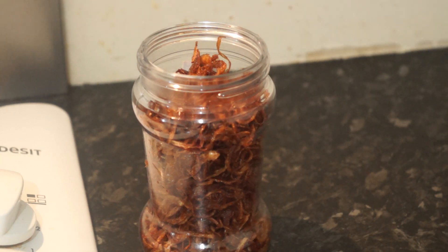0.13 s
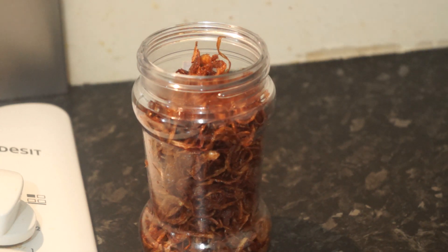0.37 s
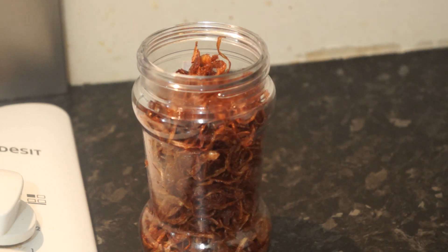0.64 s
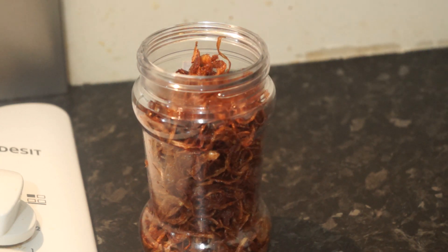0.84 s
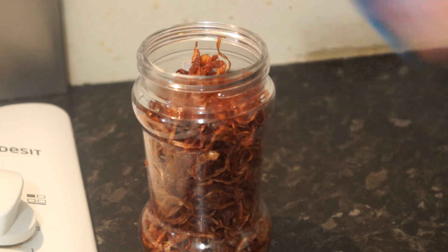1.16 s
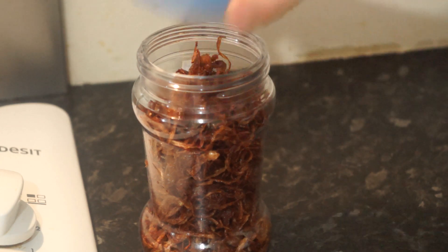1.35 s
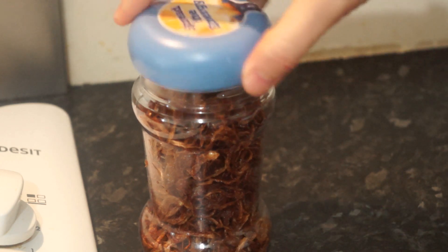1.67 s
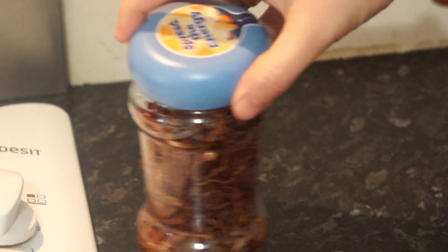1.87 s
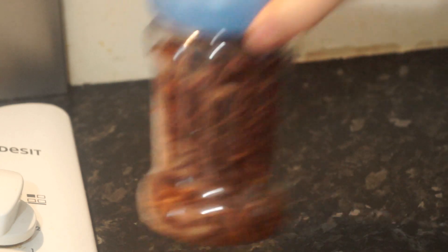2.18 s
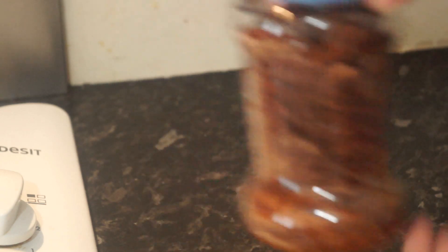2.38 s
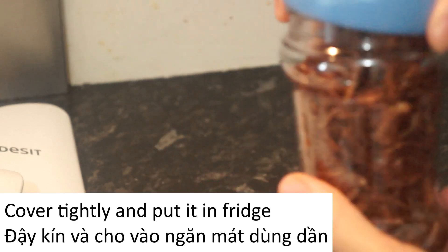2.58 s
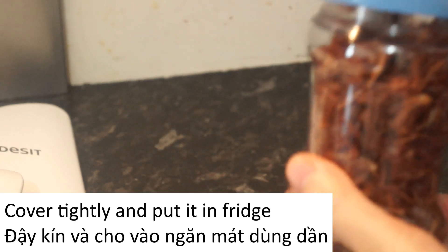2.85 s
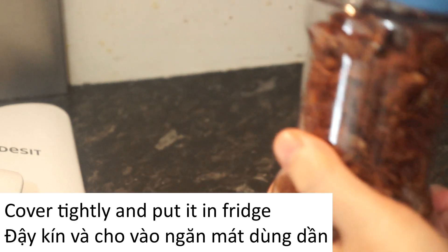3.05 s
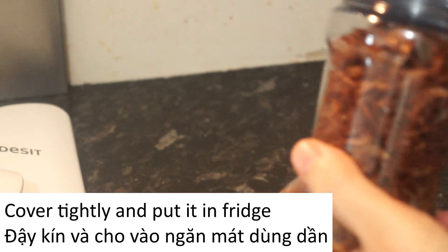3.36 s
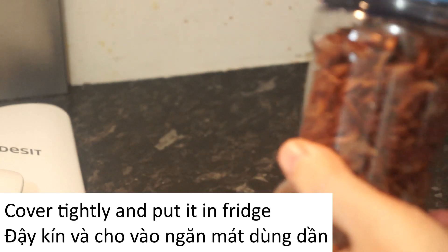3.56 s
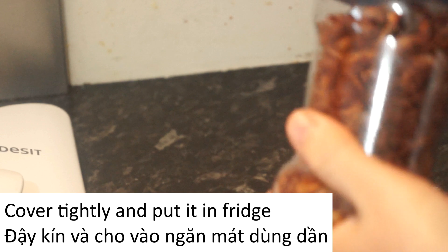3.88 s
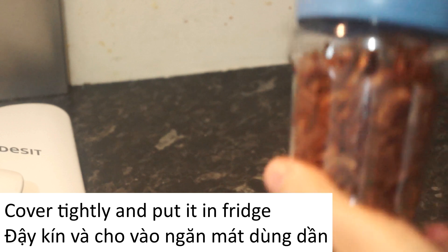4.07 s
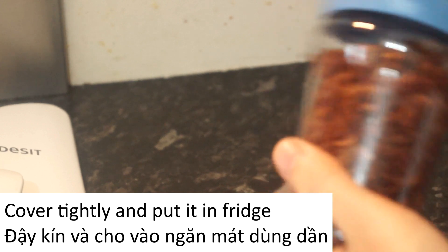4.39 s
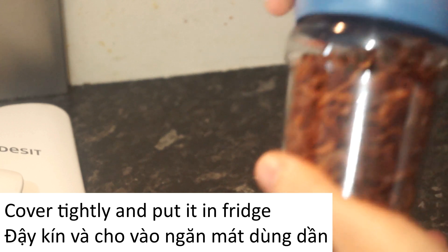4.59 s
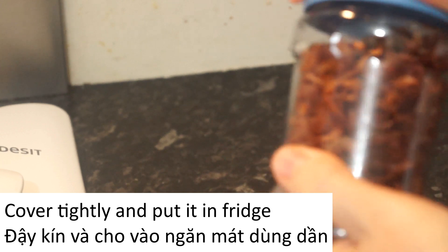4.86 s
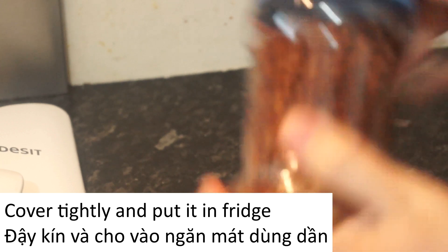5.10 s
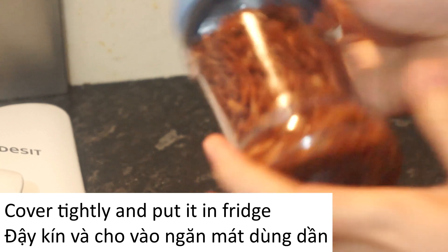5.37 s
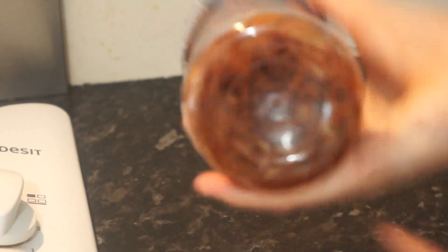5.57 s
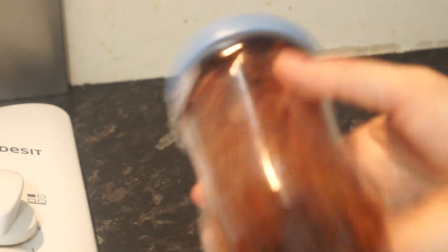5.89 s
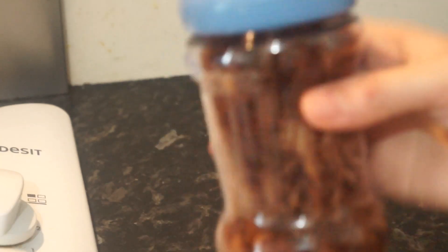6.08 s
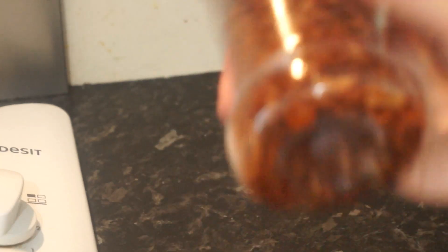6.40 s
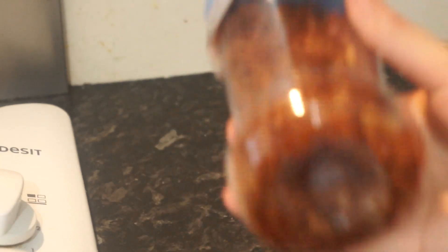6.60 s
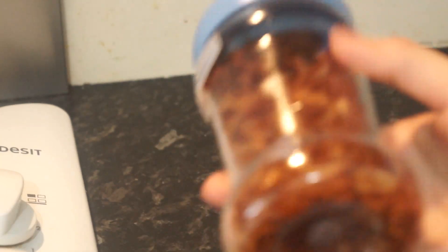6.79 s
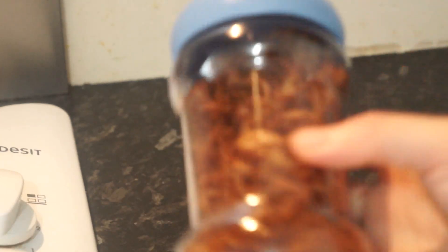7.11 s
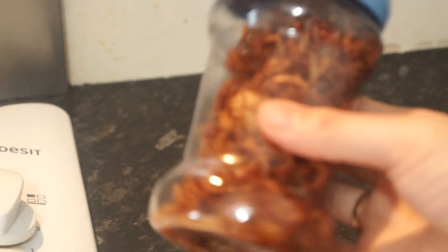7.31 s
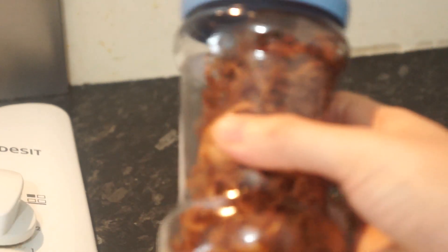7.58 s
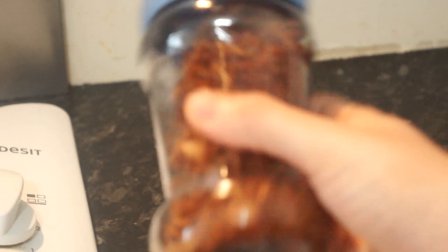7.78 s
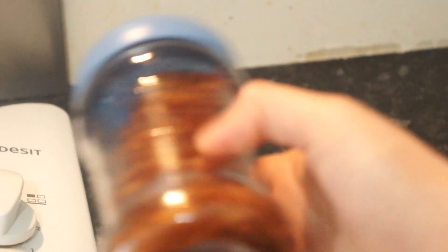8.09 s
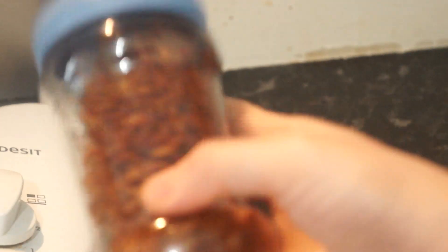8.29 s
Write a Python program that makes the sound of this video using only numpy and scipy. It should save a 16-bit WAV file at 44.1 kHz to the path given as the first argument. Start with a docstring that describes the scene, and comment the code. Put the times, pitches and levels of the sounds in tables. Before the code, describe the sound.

Spoon clinks on a kitchen counter, then a plastic lid drops on a jar, is screwed shut with sharp cracks, and dry shreds rustle inside.

```python
"""A faint fridge buzz over room hiss, then a spoon knocks and clinks on the counter of a small hard kitchen.
A lid drops onto a plastic jar and is screwed shut in jerks; dry shreds slide and tick inside as it is tipped.
Knocks are noisy blows on decaying modes, scrapes and slides are showers of tiny contacts on such modes,
ticks are short sine rings, and the hand's glide is banded noise. A stereo room tail surrounds them;
the fridge is a cluster of wavering tones and the hiss is shaped noise."""
import sys
import numpy as np
from scipy import signal
from scipy.fft import rfft, irfft
from scipy.io import wavfile
from scipy.ndimage import uniform_filter1d

SR = 44100
rng = np.random.default_rng(int(sys.argv[2]) if len(sys.argv) > 2 else 0)


def gain_from_db(level_db):
    """Convert decibel levels to linear amplitude factors (20 dB per decade)."""
    decades = np.asarray(level_db, float) / 20
    return 10 ** decades


def inscribe(sig):
    """Save sig as 16-bit PCM at rate SR to the path in sys.argv[1].

    A 1-D sig is mono; a 2-D sig holds one channel per row.
    Samples are clipped to [-1, 1] before scaling.
    """
    pcm = np.round(np.clip(np.atleast_2d(sig).T, -1, 1) * 32767)
    wavfile.write(sys.argv[1], SR, pcm.astype(np.int16))


N = 372592  # length in samples


def unit(x):
    """Scale to rms 1."""
    return x / np.sqrt(np.mean(x ** 2))


def band(x, lo, hi):
    """Band-pass between two frequencies in Hz."""
    return signal.sosfilt(signal.butter(2, (lo, hi), "bandpass", fs=SR, output="sos"), x)


def highpass(x, order, hz):
    """Cut the bass below hz."""
    return signal.sosfilt(signal.butter(order, hz, "highpass", fs=SR, output="sos"), x)


def add_at(out, start_s, sound):
    """Mix a sound into out from its start time."""
    start = int(start_s * SR)
    out[start:start + sound.size] += sound


def ring(modes, size):
    """Sum of decaying sine modes after one blow."""
    t = np.arange(size) / SR
    total = np.zeros(size)
    for hz, db, t60 in modes:
        total += gain_from_db(db) * np.sin(2 * np.pi * hz * t) * 1000. ** (-t / t60)
    return total


def crack(region):
    """The bare click of a contact in one region, peak 1."""
    impulse = np.arange(SR // 8) == 0
    click = band(band(impulse, *region), *region)
    return click / np.abs(click).max()


# Four regions that a contact shakes in the thing it strikes: thud, hollow, clack and snap.
# Each row: lower edge in Hz, upper edge in Hz.
REGIONS = [(260, 650), (650, 1500), (1500, 4500), (4500, 11500)]


def by_region(modes):
    """Sort a table of modes into the four regions."""
    edges = [0] + [lo for lo, hi in REGIONS[1:]] + [SR]
    return [[mode for mode in modes if lo <= mode[0] < hi] for lo, hi in zip(edges, edges[1:])]


def strike(hits, modes, detune, mix_db, edge, rattle_db, thud_db, chatter_ms):
    """A hit is a sharp edge, ragged chatter and a longer rattle; the shifting grip detunes and remixes the modes."""
    t = np.arange(4096) / SR
    out = np.zeros(N + SR)
    noise = rng.standard_normal((len(hits), t.size))
    noise[:, 0] = edge
    grips = rng.standard_normal((len(hits), len(modes), 2))
    cracks = [crack(region) for region in REGIONS]
    shape = np.exp(-t / (chatter_ms / 1000)) + gain_from_db(rattle_db) * np.exp(-t / 0.043)
    for (start, db, weight, snap), rough, grip in zip(hits, noise, grips):
        held = [(hz * (1 + detune * a), level + mix_db * b, t60)
                for (hz, level, t60), (a, b) in zip(modes, grip)]
        # a weightier blow lifts thud and hollow together
        shares = (weight + thud_db, weight, 0, snap)
        for body, click, share in zip(by_region(held), cracks, shares):
            response = click + ring(body, size=click.size)
            sound = signal.fftconvolve(rough * shape, response)
            add_at(out, start, gain_from_db(db + share) * sound / np.abs(sound).max())
    return out[:N]


def surges(strokes):
    """Levels of the light and heavy regions: a stroke swells to its peak and fades, by 1 / e in its times."""
    power = np.zeros((2, N))
    for peak_s, db, build_ms, fade_ms, weight in strokes:
        span = np.arange(max(int((peak_s - 1) * SR), 0), min(int((peak_s + 1) * SR), N))
        ms = (span / SR - peak_s) * 1000
        shape = np.exp(-2 * np.maximum(ms / fade_ms, -ms / build_ms))
        power[:, span] += shape * gain_from_db([[2 * db], [2 * (db + weight)]])
    return np.sqrt(power)


def rub(strokes, bodies, rate, scatter_db, shift_db, thud_db, hollow_db, hiss_db):
    """Tiny contacts of uneven size, each waking one resonance; the favoured ones shift as the parts move."""
    out = np.zeros(N)
    light, heavy = surges(strokes)
    levels = (heavy * gain_from_db(thud_db), heavy * gain_from_db(hollow_db), light, light * gain_from_db(hiss_db))
    for region, modes, level in zip(REGIONS, bodies, levels):
        click, sound = crack(region), np.zeros(N)
        for response in [click] + [ring([mode], size=click.size) for mode in modes]:
            sizes = gain_from_db(scatter_db * np.minimum(rng.exponential(size=N), 4))
            favour = gain_from_db(shift_db * unit(uniform_filter1d(rng.standard_normal(N), SR // 30)))
            contacts = rng.random(N) < rate / SR  # rate is contacts per second for each resonance
            grains = contacts * rng.standard_normal(N) * sizes * favour
            sound += signal.oaconvolve(grains, response)[:N]
        out += unit(sound) * level
    return out


def thumps(pushes, modes):
    """A soft, ragged push that wakes only low modes."""
    t = np.arange(2048) / SR
    out, body = np.zeros(N + SR), crack(REGIONS[0])
    body = body + ring(modes, size=body.size)
    fade = np.exp(-t / 0.0102)
    for (start, db), rough in zip(pushes, rng.standard_normal((len(pushes), t.size))):
        sound = signal.fftconvolve(rough * fade, body)
        add_at(out, start, gain_from_db(db) * sound / np.abs(sound).max())
    return out[:N]


# Lid pressed down or jumping a thread, or a finger tapping the jar.
# Each row: start in seconds, clack peak in dB, weight in dB added to thud and hollow,
# snap in dB against the clack.
LID_HITS = [(1.8455, -15.5, -12, -6.5), (2.5204, -30.5, -28, 0), (2.5474, -38, -1.5, -18),
            (2.629, -38.5, 4.5, -1.5), (2.7487, -23.5, -12.5, -15.5), (2.8976, -32, -29, -6.5),
            (3.0032, -19, -10, -4), (3.0131, -14.5, -35, -4.5), (3.0251, -11, -14, -33),
            (3.1834, -10.5, -23, -8.5), (3.253, -23, -18, 1.5), (3.289, -17, -38, -14),
            (3.46, -23, -17, -5), (3.5264, -28, -17, -17), (3.5368, -32, -3, 0), (3.5518, -32, 4, 3),
            (3.682, -32.5, 6, 8), (3.7517, -21.5, -9, -13), (3.7744, -42, -1, -14),
            (3.815, -24.5, -25, -42), (3.8672, -30, -4.5, 5), (3.8891, -21, -13.5, -5.5),
            (4.004, -28, -33, -28), (4.0102, -26.5, -7, -34), (4.0284, -35, 2, 7.5),
            (4.0424, -38.5, 4, -26), (4.263, -17.5, -24, -2.5), (4.2679, -19.5, -26, -29),
            (4.314, -20, -32, -28), (7.7679, -40, -4, -2.5), (8.008, -46.5, 1.5, -7)]
# Modes of jar and lid, before the grip shifts them.
# Each row: frequency in Hz, level in dB against the crack, t60 in seconds.
JAR = [(220, -10, .07), (310, -8, .05), (415, -9, .04), (528, -6, .05), (700, -13, .025), (890, -9, .028),
       (1020, -10, .028), (1150, -11, .025), (1290, -12, .02), (1620, -11, .014), (1920, -9, .013),
       (2200, -10, .012), (2750, -11, .01), (3300, -15, .01), (3800, -19, .008)]


def lid_knocks():
    """Hard knocks on jar and lid, whose modes the gripping hand shifts and rebalances."""
    return strike(LID_HITS, JAR, detune=0.076, mix_db=10.5, edge=7.1, rattle_db=-13.5, thud_db=-29,
                  chatter_ms=3.1)


# Each jerk of the wrist drags the threads.
# Each row: peak time in seconds, scrape level in dB, build-up in ms, fade in ms,
# weight in dB added to thud and hollow.
THREAD_JERKS = [(2.474, -60.5, 61, 100, -4), (2.552, -55.5, 30, 63, 6), (2.76, -53.5, 24, 59, 9),
                (2.894, -61, 11, 55, 3), (3.025, -41, 16, 98, 3), (3.181, -24, 4, 8.7, -1.5),
                (3.195, -39, 38, 112, 4), (3.295, -61, 8.1, 65, -16), (3.47, -68.5, 5.9, 30, 0),
                (3.556, -46, 11, 37, 3), (3.679, -39, 8, 13, -4), (3.7, -55, 8, 54, 8.5),
                (3.748, -44.5, 5, 73, 2), (4.012, -40, 4.6, 43, -1), (4.265, -34.5, 4.8, 13.4, 6.5),
                (4.318, -43, 2, 74, 7)]


def thread_scrape():
    """Dragging threads make a stream of tiny contacts that ring the jar."""
    return rub(THREAD_JERKS, by_region(JAR), rate=1300, scatter_db=3.2, shift_db=4.0, thud_db=-13.5,
               hollow_db=-6, hiss_db=-11)


# The palm bears down on the jar.
# Each row: start in seconds, peak in dB.
PALM_PUSHES = [(1.8451, -36), (2.629, -43), (2.7487, -47), (2.8977, -42), (3.0132, -23.5), (3.183, -36),
               (3.254, -47), (3.5276, -41), (4.263, -48)]


def palm_thumps():
    """The bearing palm moves only the lowest modes of the jar."""
    return thumps(PALM_PUSHES, by_region(JAR)[0])


# Lid laid on the rim.
# Each row: start in seconds, clack peak in dB, weight in dB added to thud and hollow,
# snap in dB against the clack.
LID_DROP = [(1.6106, -25.5, 0, -43), (1.656, -52, 0, -25), (1.7206, -55, 13, -28), (1.7909, -46, -20, -5)]
# Modes of the jar under a loose lid, before any shift by the grip.
# Each row: frequency in Hz, level in dB against the crack, t60 in seconds.
LOOSE_JAR = [(420, 2, 0.049), (815, -33, 0.054), (1080, -3.5, 0.042), (1647, -2.5, 0.057),
             (2340, -1, 0.023), (2600, -7, 0.018), (3100, -2, 0.012)]


def lid_drop():
    """The lid lands on the rim and rings the jar under it."""
    return strike(LID_DROP, LOOSE_JAR, detune=0.005, mix_db=3, edge=5.1, rattle_db=-25, thud_db=-18,
                  chatter_ms=5.2)


# Loose lid rocking on the rim.
# Each row: peak time in seconds, scrape level in dB, build-up in ms, fade in ms,
# weight in dB added to thud and hollow.
ROCKING = [(1.625, -44.5, 10, 31, 5), (1.721, -46.5, 4, 13, -14), (1.8, -56.5, 41, 120, 11)]


def lid_rocking():
    """The rocking lid grinds on the rim in many tiny contacts."""
    return rub(ROCKING, by_region(LOOSE_JAR), rate=1500, scatter_db=0.0, shift_db=5.5, thud_db=-9.5,
               hollow_db=-10, hiss_db=-31)


# A hand glides over the jar.
# Each row: time in seconds, rms level in dB.
GLIDE = [(2.33, -80), (2.446, -57.5), (2.606, -56.5), (2.654, -57.5), (2.74, -67)]
# Bands in which the skin hisses.
# Each row: centre in Hz, width in Hz, level in dB against the other bands.
SKIN = [(2580, 760, -5.5), (3900, 840, -1), (5300, 480, -9)]


def swish():
    """Skin gliding over smooth plastic: fine noise in a few soft bands."""
    s, db = np.transpose(GLIDE)
    bands = np.zeros(N)
    for hz, width, level in SKIN:
        bands += gain_from_db(level) * unit(band(rng.standard_normal(N), hz - width / 2, hz + width / 2))
    return unit(bands) * gain_from_db(np.interp(np.arange(N) / SR, s, db, left=-120, right=-120))


# Surges of sliding shreds.
# Each row: peak time in seconds, rattle level in dB, build-up in ms, fade in ms,
# weight in dB added to thud and hollow.
SLIDE = [(4.478, -60.5, 61, 110, -24), (5.2, -66, 46, 54, -10.5), (5.29, -60.5, 28, 100, 1),
         (5.45, -71, 80, 120, -6), (5.6, -55, 37, 59, 3), (5.662, -38, 15.7, 13, -20),
         (5.72, -43, 35, 120, -9), (5.848, -40, 28, 10, 8), (5.908, -38.5, 40, 34, 0.5),
         (6.01, -36.5, 36, 62, 0), (6.168, -41.5, 22, 95, -2), (6.348, -41.5, 39, 46, -0.5),
         (6.442, -36.5, 25, 90, -21), (6.528, -40, 53, 21, 4), (7.71, -66, 110, 10, 10.5),
         (7.798, -60, 15, 34, 12), (7.9, -67.5, 65, 85, 16.5), (8.016, -68, 30, 39, 6),
         (8.098, -64.5, 12, 26, -5), (8.36, -60, 28, 40, 8.5), (8.436, -56.5, 21, 33, -1)]
# Resonances that ring under the sliding shreds, one list for each region: the low ones are the sealed jar's, #
# the upper, short ones spread the shreds' own pitches. # Each row: frequency in Hz, level in dB against the
# crack, t60 in seconds.
SLIDE_BODIES = [
    [(416, 2, 0.062), (510, 7, 0.072)],
    [(1092, 6.5, 0.024), (2080, -7, 0.03)],
    [(2420, -21, 0.014), (2720, -12, 0.0087), (3250, -24, 0.013), (3730, -7.5, 0.014), (4390, -5, 0.0051)],
    [(5280, -6, 0.0063), (5800, -8.5, 0.0092), (6660, -6.5, 0.0065), (7100, -1, 0.0047), (8050, -2, 0.0031),
     (9490, -30, 0.0071)],
]


def sliding_shreds():
    """Sliding shreds shower the wall of the sealed jar with tiny contacts."""
    return rub(SLIDE, SLIDE_BODIES, rate=1250, scatter_db=1.0, shift_db=3.5, thud_db=-18.5, hollow_db=-14,
               hiss_db=-0.74)


# The whole pile lands on one end.
# Each row: start in seconds, clack peak in dB, weight in dB added to thud and hollow,
# snap in dB against the clack.
PILE = [(5.6531, -37.5, 0, -25), (6.0038, -50, -14, -25), (6.4547, -39, 4, -29), (6.4602, -32.5, -3.5, -29),
        (6.6164, -52.5, 5, -25)]
# Modes of the air column that the landing pile thumps, before the small random shift of each hit.
# Each row: frequency in Hz, level in dB against the crack, t60 in seconds.
AIR_COLUMN = [(533, -3, .04), (1020, 5, .05), (2170, 4, .035)]


def pile_landing():
    """The landing pile thumps the air column, with a rattle that outweighs the first chatter."""
    return strike(PILE, AIR_COLUMN, detune=0.005, mix_db=3, edge=5.6, rattle_db=14, thud_db=-39,
                  chatter_ms=11.0)


# Clumped shreds bump the end of the sealed jar.
# Each row: start in seconds, peak in dB before the bass cut.
BUMPS = [(5.84, -51), (5.985, -39), (6.0038, -37), (6.49, -52)]


def clump_bumps():
    """A clump pushes softly at the jar and wakes its low modes."""
    return thumps(BUMPS, SLIDE_BODIES[0])


# Single shreds hitting the wall.
# Each row: start in seconds, level of the ring in dB, pitch in Hz.
TICKS = [(4.478, -40, 7440), (4.861, -41.5, 6750), (5.495, -43, 6840), (5.388, -48, 6000),
         (5.5193, -45.5, 8300), (5.554, -46, 4830), (5.58, -45, 5200), (5.6473, -35, 7050),
         (5.6566, -25, 6560), (5.8325, -22.5, 6560), (5.8696, -30, 3880), (5.8983, -23.5, 7440),
         (5.9898, -39, 3600), (6.0074, -34, 6500), (6.0283, -25, 7550), (6.034, -29, 3400),
         (6.0426, -26, 5550), (6.0492, -35, 6400), (6.1696, -24.5, 5560), (6.2076, -31.5, 3860),
         (6.2657, -22, 7300), (6.337, -28, 6230), (6.3698, -19.5, 6740), (6.4229, -32, 6000),
         (6.4448, -29, 6900), (6.4766, -25, 4170), (6.513, -28, 8000), (6.5113, -25.5, 3830),
         (6.533, -27.5, 3970), (7.3326, -52, 8500), (7.635, -53, 6430), (7.7954, -46, 3960),
         (7.914, -48, 3920), (8.0986, -56, 5500), (8.357, -46.5, 3520), (8.3863, -42, 7600),
         (8.4235, -28.5, 6970)]


def shred_ticks():
    """A brittle shred rings for a few cycles, with a wide snap in front."""
    t = np.arange(400) / SR
    out = np.zeros(N + t.size)
    noise = rng.standard_normal((len(TICKS), t.size))
    snaps = band(noise, 3500, 11000) * np.exp(-t / .001)
    for (start, db, hz), snap in zip(TICKS, snaps):
        tone = np.sin(2 * np.pi * hz * t) * np.exp(-t * hz / 7.8)  # falls by 1 / e in 7.8 cycles
        add_at(out, start, gain_from_db(db) * (tone + gain_from_db(1.5) * snap))
    return out[:N]


# Spoon knocking the counter.
# Each row: start in seconds, clack peak in dB, weight in dB added to thud and hollow,
# snap in dB against the clack.
SPOON_HITS = [(0.3732, -51, -12, -14), (0.9482, -54, 10.5, -4), (0.9744, -47.5, 0.5, -3),
              (0.9932, -42.5, 3, -5.5), (1.0454, -41, 10, 3), (1.0517, -31.5, 8, -15),
              (1.0849, -52, 14, -22), (1.1179, -39.5, 12.5, -7), (1.1294, -42.5, 10.5, 0),
              (1.1491, -51.5, 11, 1)]
# Modes of the counter top, before each hit shifts them.
# Each row: frequency in Hz, level in dB against the crack, t60 in seconds.
COUNTER = [(330, -13, 0.08), (570, -1, 0.042), (667, -13, 0.1), (850, -25, 0.066), (995, -2, 0.028),
           (1210, -18, 0.064), (1300, -37, 0.062)]


def spoon_knocks():
    """The bouncing spoon knocks on the modes of the counter top."""
    return strike(SPOON_HITS, COUNTER, detune=0.067, mix_db=3, edge=3.6, rattle_db=-5.5, thud_db=-6,
                  chatter_ms=4.9)


# Bounces that make the spoon itself ring.
# Each row: start in seconds, level in dB, favoured pitch in Hz, spread in octaves.
CLINKS = [(.951, -38, 4250, .2), (.993, -46, 1950, .3), (1.052, -34, 3500, .9), (1.068, -35, 2900, 1.3),
          (1.130, -39, 8565, .3)]
# Modes of the spoon.
# Each row: frequency in Hz, level in dB before the contact favours some, t60 in seconds.
SPOON = [(1875, -6, .3), (2333, 2, .13), (3225, 1.5, .48), (3519, 1.5, .06), (4250, -21, .25),
         (5685, -4, .2), (8565, -4, .07)]


def spoon_clinks():
    """Each bounce of the spoon wakes the modes near the pitch that its contact favours."""
    out = np.zeros(N + SR)
    for start, db, centre_hz, octaves in CLINKS:
        woken = [(hz, level + db - 12 * (np.log2(hz / centre_hz) / octaves) ** 2, t60)
                 for hz, level, t60 in SPOON]
        add_at(out, start, ring(woken, size=SR // 2))
    return out[:N]


# Kitchen echo, band by band.
# Each row: centre in Hz, t60 in seconds, tail level in dB before the band-pass, side share of the tail
# as a ratio to the mid, left minus right in dB.
ROOM = [(140, 0.24, -2, 0.53, 0), (363, 0.39, -3, 0.46, -2.5), (1080, 0.42, -2, 0.65, -2),
        (2440, 0.37, -3.5, 1.08, -6), (6260, 0.26, -2.5, 1.45, -2.5)]


def kitchen(dry):
    """Direct sound a little to the right, then a diffuse tail that differs between channels, most in the treble."""
    dry = highpass(dry, 4, 210)  # the bass is cut below about 210 Hz
    t = np.arange(int(.6 * SR)) / SR
    mid, side = rng.standard_normal((2, t.size))
    hz, _, _, _, left_right_db = np.transpose(ROOM)
    edges = np.r_[30, np.sqrt(hz[1:] * hz[:-1]), 16000]
    sign = np.array([[1], [-1]])
    onset = 1 - np.exp(-(t / 0.00041) ** 2)  # counter and wall answer within milliseconds
    response = np.zeros((2, t.size))
    for lo, hi, (_, t60, db, share, _) in zip(edges, edges[1:], ROOM):
        decay = onset * 1000. ** (-t / t60)
        tail = band(mid + share * sign * side, lo, hi)
        response += gain_from_db(db) * tail * decay / np.linalg.norm(decay)
    response[:, 0] += 1  # direct sound
    f = np.fft.rfftfreq(2 * N, 1 / SR) + 1
    pan = gain_from_db(sign * np.interp(np.log(f), np.log(hz), left_right_db) / 2)
    return irfft(rfft(dry, 2 * N) * rfft(response, 2 * N) * pan)[:, :N]


# Spectrum shape of the room hiss, before it is scaled to its overall level.
# Each row: frequency in Hz, relative level in dB per Hz.
HISS_SHAPE = [(18, -69), (30, -31), (243, -21.5), (409, -11.5), (452, -13.5), (641, -7.5), (726, -9),
              (886, -8), (954, -7.5), (2710, -10), (3000, -11.5), (10700, -20), (11500, -33), (15000, -61),
              (22000, -120)]


def room_hiss():
    """Slowly swelling shaped noise, alike in both channels only in the bass."""
    f = np.fft.rfftfreq(N, 1 / SR) + 1
    hz, db = np.transpose(HISS_SHAPE)
    mid, side = rfft(rng.standard_normal((2, N))) * gain_from_db(np.interp(np.log(f), np.log(hz), db))
    hiss = irfft(mid + side * np.array([[1], [-1]]) * f / np.hypot(f, 200.), N)
    swell = unit(uniform_filter1d(rng.standard_normal(N), SR // 2, mode="wrap"))
    # dB rms of the two channels' mean, swelling by 0.52 dB rms
    return hiss * gain_from_db(-62.5 + 0.52 * swell) / np.std(hiss.mean(axis=0))


# Fridge tones.
# Each row: frequency in Hz, rms level in dB about which the tone wavers.
FRIDGE = [(2519, -79.5), (2616, -79.5), (2665, -82), (2713, -76.5), (2762, -77)]


def fridge_buzz():
    """A cluster of tones whose phase and level waver slowly in each channel."""
    out = np.zeros((2, N))
    for hz, db in FRIDGE:
        waver = unit(uniform_filter1d(rng.standard_normal((2, N)), SR // 8, mode="wrap"))
        phase = 2 * np.pi * hz * np.arange(N) / SR + 0.89 * waver  # radians
        level = gain_from_db(db + 2.5 * waver[::-1])  # each level follows the other channel's waver
        out += np.sqrt(2) * level * np.sin(phase)
    return out


def scene():
    """Everything on the counter sounds into the kitchen, over fridge and hiss."""
    jar = lid_knocks() + thread_scrape() + palm_thumps() + lid_drop() + lid_rocking() + swish()
    shreds = highpass(sliding_shreds() + pile_landing() + clump_bumps(), 2, 330)  # the bass of the contents is cut below about 330 Hz
    spoon = spoon_knocks() + spoon_clinks()
    return kitchen(jar + shreds + shred_ticks() + spoon) + room_hiss() + fridge_buzz()


def roll_off(x):
    """The treble ends steeply here."""
    return signal.sosfilt(signal.butter(12, 12220, fs=SR, output="sos"), x)


def record(dry):
    """The microphone chain cuts the top steeply above 10920 Hz."""
    steep_cut = signal.ellip(8, .2, 45, 10920, fs=SR, output="sos")
    mix = signal.sosfilt(steep_cut, dry)
    return roll_off(mix)


dry = scene()
out = record(dry)
inscribe(out)
```